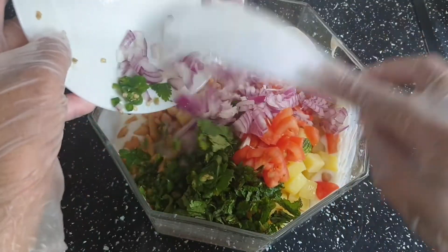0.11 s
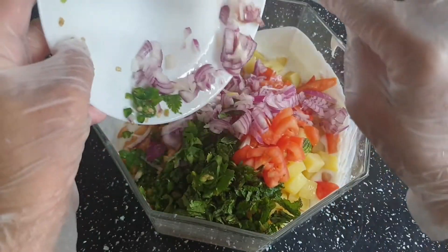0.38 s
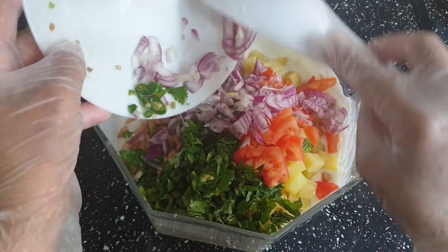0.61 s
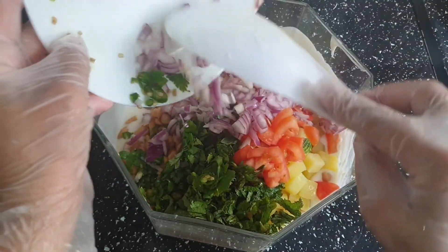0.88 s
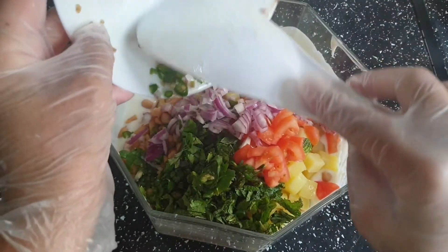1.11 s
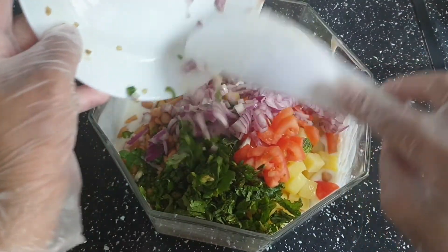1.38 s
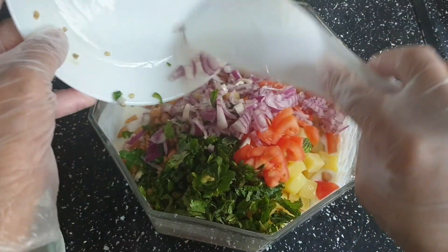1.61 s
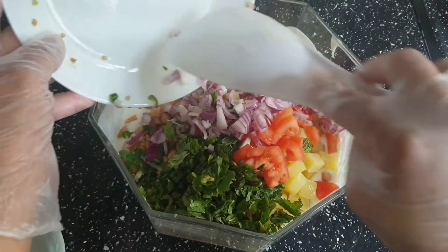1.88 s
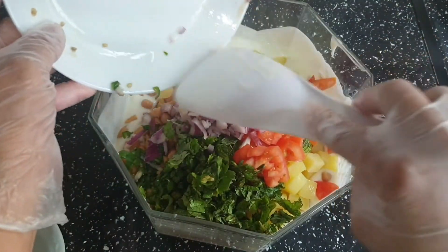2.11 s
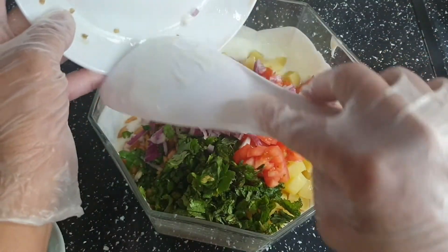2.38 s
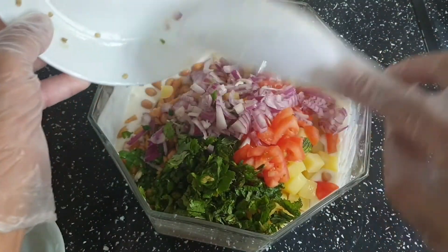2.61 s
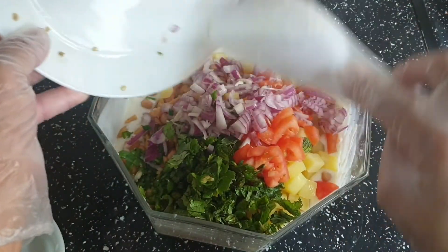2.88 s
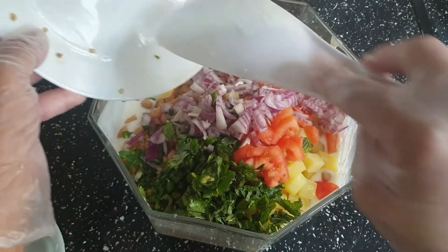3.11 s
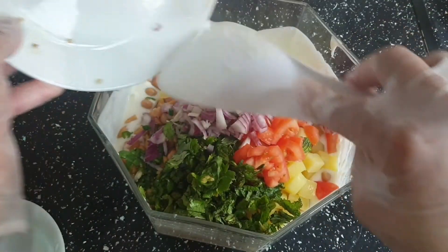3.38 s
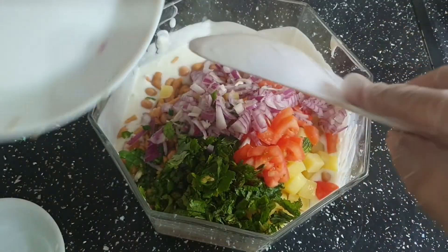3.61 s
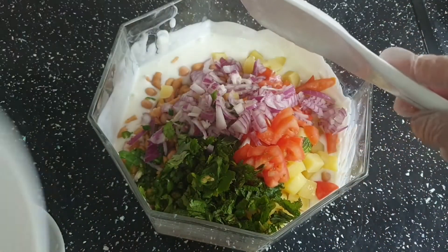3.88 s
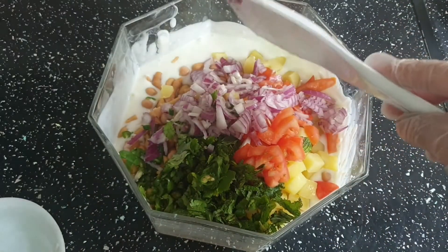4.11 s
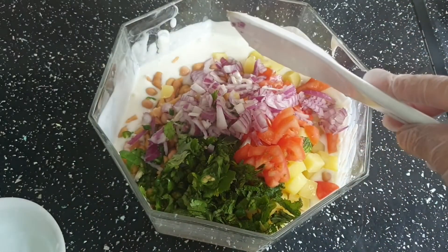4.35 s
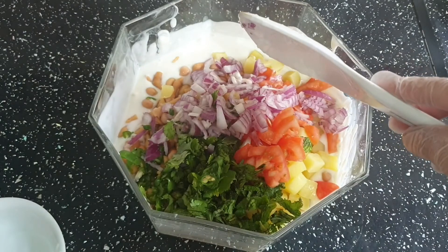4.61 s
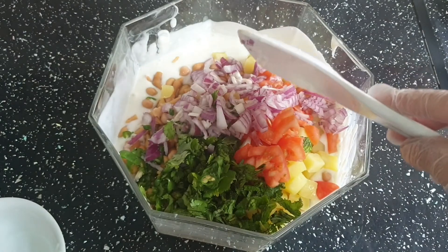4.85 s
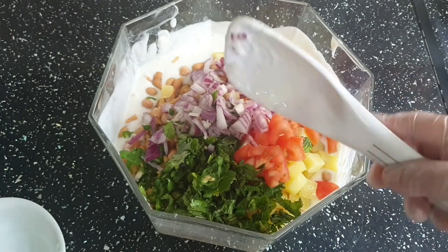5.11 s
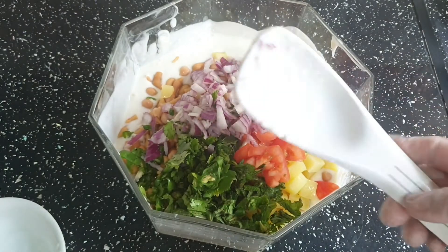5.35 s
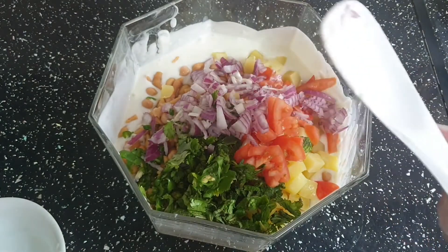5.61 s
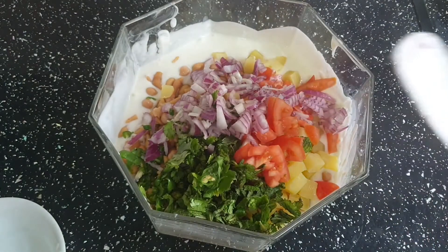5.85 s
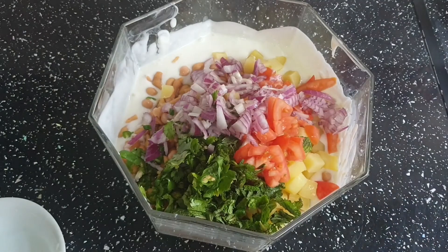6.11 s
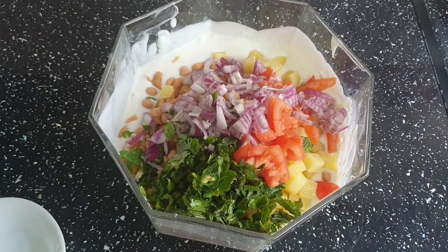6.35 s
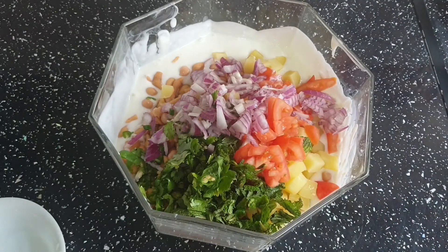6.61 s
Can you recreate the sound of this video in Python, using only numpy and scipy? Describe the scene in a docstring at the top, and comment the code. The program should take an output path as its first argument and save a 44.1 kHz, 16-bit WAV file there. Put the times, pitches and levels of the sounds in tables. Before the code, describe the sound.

In a small, hard-walled kitchen, a plastic spoon knocks a hand-held china plate about a dozen times, dry cracks with short bright rings and tiny scrapes. A quieter pause of soft thuds follows, then the plate clacks onto stacked dishes, is nudged along them, and the spoon drops hollowly on the counter. Close stereo pickup, plate well left, thuds nearer the middle, faint hiss.

```python
"""A plastic serving spoon knocks and scrapes chopped vegetables off a hand-held china plate into a glass bowl:
each blow is a dry crack plus the ringing modes of the plate. The plate is then laid on other dishes and pushed
along them, and the spoon is dropped on the counter. Gloves rustle, food is stirred and thuds softly, the counter
bumps and rumbles as coloured noise and low cycles; a small kitchen reflects, and a faint hiss swells as the
hands move. Two microphone ports hear it, the plate well to the left and the soft thuds nearer the middle."""
import sys
import numpy as np
from scipy import signal
from scipy.fft import rfft, irfft, next_fast_len
from scipy.io import wavfile

SR = 44100
rng = np.random.default_rng(int(sys.argv[2]) if len(sys.argv) > 2 else 0)


def log_audio(samples):
    """Write samples as a 16-bit WAV file to the path given in sys.argv[1]."""
    # one column per channel
    frames = np.atleast_2d(samples).T
    # limit to full scale, then quantise
    limited = np.clip(frames, -1, 1)
    pcm = np.round(limited * 32767).astype(np.int16)
    wavfile.write(sys.argv[1], SR, pcm)


def attenuation_scalar(level_db):
    """Turn a level in dB into a linear amplitude multiplier (20 dB per decade)."""
    decades = np.asarray(level_db, float) / 20
    return 10 ** decades


N = 296887   # samples
RING = np.arange(SR * 2 // 5) / SR   # time axis of one struck sound, s
PLATE_LEAD, COUNTER_LEAD = 5.1, 4.84   # samples by which the left port hears plate and dishes first


def rms_one(x):
    """Scale to unit rms."""
    return x / np.sqrt(np.mean(x ** 2) + 1e-20)


def at_hz(points, hz):
    """Read a (Hz, value) table on a log-frequency axis."""
    table_hz, values = np.array(points).T
    return np.interp(np.log(hz), np.log(table_hz), values)


def in_time(rows):
    """Columns of a curve table at every sample."""
    s, *columns = np.transpose(rows)
    return [np.interp(np.arange(N) / SR, s, c) for c in columns]


def add(track, s, sound):
    """Mix a sound in at s seconds."""
    i = round(s * SR)
    track[..., i:i + sound.shape[-1]] += sound[..., :N - i]


def shaped(x, gain):
    """Filter by a gain given as a function of Hz."""
    hz = np.maximum(np.fft.rfftfreq(x.shape[-1], 1 / SR), 20)
    return irfft(rfft(x) * gain(hz), x.shape[-1])


def decay(t60):
    """Exponential loss of energy: falls 60 dB in t60 seconds, never in less than 5 ms."""
    return attenuation_scalar(-60 * RING / max(t60, .005))


def burst(gain, t60):
    """Coloured noise that starts at once and dies, with a straight fade to the end; about rms 1 at its start."""
    noise = rms_one(shaped(rng.standard_normal(len(RING)), gain))
    return noise * decay(t60) * (1 - RING / RING[-1])


WAVER_PER_S = 75   # how fast grip and motion make a ringing mode waver


def modes(table, waves, group_db, length, place, spread_db, waver, fade=decay):
    """One blow: groups have their own strength; the place on the rim sets how far each pattern is driven."""
    hz, level_db, t60 = np.transpose(table)
    waves = np.array(waves)
    share = np.where(waves < 0, np.sin(-waves * place), np.cos(waves * place))
    sign = np.where(waves == 0, rng.choice([-1, 1], len(hz)), 1)
    chance_db = spread_db * rng.standard_normal(len(hz))
    strength = attenuation_scalar(level_db + group_db(hz) + chance_db) * share * sign
    out = 0
    for g, f, t in zip(strength, hz, t60):
        # a body that is held and moved wavers in phase and strength, more so as the ring goes on
        turn, swell = [np.interp(RING * WAVER_PER_S, np.arange(40), v) for v in rng.standard_normal((2, 40))]
        grown = waver * np.sqrt(min(f, 4500) / 1650) * (1 - np.exp(-RING / 0.023))
        tone = np.sin(2 * np.pi * f * RING + grown * turn)
        out = out + g * tone * np.exp(.5 * grown * swell) * fade(t * length)
    return out


# how the far port is shaded: pitch_hz, share (of a source's left minus right dB)
PORT_SHADOW = [(100, -0.07), (400, .5), (1500, 1.3955), (5000, 0.84), (12000, -0.23)]


def ports(x, pan_db, lead):
    """Direct sound at the two ports: the far one is shaded, most in the middle range, and hears later."""
    gain = lambda hz: attenuation_scalar(pan_db * at_hz(PORT_SHADOW, hz) * np.array([[.5], [-.5]]))
    late = lambda hz: np.exp(-2j * np.pi * hz * lead / SR * np.array([[0], [1]]))
    both = np.zeros((2, next_fast_len(len(x) + SR // 20)))
    both[:, :len(x)] = x
    return shaped(both, lambda hz: gain(hz) * late(hz))[:, :len(x)]


# colour of the plastic spoon's crack: pitch_hz, level_db (per Hz, relative)
SPOON_CRACK = [(88, -51), (150, -30), (941, 3.5), (1310, -10.5), (1660, -10), (2550, -4), (2810, -0.5),
               (3770, -8), (6770, -10.5), (9080, -31.5), (16000, -47)]


def knock(slope_db=0):
    """The spoon itself: a short dry crack, tilted by slope_db per octave about 2 kHz."""
    return burst(lambda hz: attenuation_scalar(at_hz(SPOON_CRACK, hz) + slope_db * np.log2(hz / 2000)), t60=0.052)


# while the spoon still touches, modes die in this share of their time; a weaker part rings on
CONTACT_SHARE, AFTER_DB = .45, -11


def touched(t60):
    """A quick first fall under the spoon, then the free ring."""
    return decay(t60 * CONTACT_SHARE) + attenuation_scalar(AFTER_DB) * decay(t60)


# spoon on plate: start_s, ring_db, crack_db, softness (0 = sharp edge), place_rad (on the rim)
PLATE_BLOWS = [(0.378, -16, -14, 0.16, 3.27), (0.401, -21, -39, 0, 0.31), (1.013, -49, -54, 1.1, 0.046),
               (1.083, -14.5, -29.5, 0.96, 2.77), (1.232, -26, -17.5, 1.1, 0.03),
               (1.556, -15, -18, 0.2, 1.05), (1.683, -25, -19, 1.3, 0.028), (1.999, -68.5, -74, 0, 1.44),
               (2.045, -24.5, -26.5, 1.7, 0.029), (2.396, -22, -23.5, 0, 2.28),
               (2.482, -24, -32.5, 0.27, 2.264), (2.532, -33.5, -45.5, .6, 0.0073),
               (2.79, -21, -21.5, .5, 3.17), (2.927, -32.5, -51, 1.2, 0.023),
               (3.259, -14.5, -18, 0.36, 2.204)]
# the plate moves in the hand: start_s, pan_db (left minus right),
# length (share of the free ring left by grip and spoon), crack_tilt_db (per octave, as the spoon turns)
PLATE_HOLD = [(0.38, 9.5, 0.31, -1), (1.01, 6.5, .6, 0.5), (1.08, 8.5, 0.14, -4), (1.23, 11.5, 0.38, 2.5),
              (1.56, 14, 0.39, 2), (1.68, 12.5, 0.26, 4.5), (2.05, 17.5, 0.44, -1), (2.4, 9.5, 0.25, 3),
              (2.48, 8, 0.21, 3), (2.54, 2, 0.37, -13), (2.8, 7.5, 0.44, 2.5), (3.26, 13, 0.5, -6)]
# groups of plate modes: pitch_hz, level_db (under a sharp blow), lost_db (per unit of softness)
PLATE_GROUPS = [(453, -9, 16), (880, -1.5, 17.5), (1782, -0.94, -0.77), (3020, -3, 18), (4500, -4.5, 31.5),
                (7000, 3.5, 41)]
# modes of the freely ringing plate: pitch_hz, level_db (within its group), t60_s
PLATE_MODES = [(435, -7, 0.82), (636, -5, 0.2), (924, -6, 0.56), (935, -5, 0.22), (1296, -5, 0.088),
               (1110, -7, 0.032), (1649, 0, 0.42), (1734, -4.5, 0.44), (1933, -8.5, 0.098),
               (2114, -20.5, 0.21), (2450, -18, 0.33), (2805, 7.5, 0.44), (2804, 3, 0.86),
               (3210, -8.5, 0.33), (3280, -10, 0.092), (3970, -12, 0.69), (4254, 5, 0.6), (4366, 1, 0.3),
               (4440, 1, 0.75), (4883, -8, 0.35), (5000, -14.5, 0.091), (5480, -1, 0.14), (5460, -9, 0.16),
               (6680, -8.5, 0.63), (7090, -5, 0.034), (6790, 3, 0.31), (7320, -2, 0.022), (7720, -5, 0.07),
               (9500, -31, 0.03), (13600, -14, 0.09)]
# waves round the rim of each plate mode; minus marks a pattern turned on the rim, mostly the twin of a
# split pair, 0 a lone mode
PLATE_RIM_WAVES = [0, 0, 2, -2, 0, 0, 3, -3, -1, 0, 0, 4, -4, 0, 0, 0, 5, -5, 0, 0, 0, 0, 0, 0, 0, 6, -6, 0,
                   0, 0]
# dense upper modes, heard as a splash: lowest_hz, highest_hz, level_db (against an untilted crack), t60_s (free)
PLATE_SPLASH = (8000.5, 15800, -37, 0.81)


def plate():
    """A crack plus the plate's ring; a softer contact leaves mostly the ring near 1.8 kHz, the grip shortens it."""
    out = np.zeros((2, N))
    low, high, top_db, top_t60 = PLATE_SPLASH
    group_hz, sharp_db, lost_db = np.transpose(PLATE_GROUPS)
    hold_s, *hold_columns = np.transpose(PLATE_HOLD)
    for s, ring_db, crack_db, softness, place in PLATE_BLOWS:
        pan_db, length, tilt_db = [np.interp(s, hold_s, c) for c in hold_columns]
        groups = np.transpose([group_hz, ring_db + sharp_db - softness * lost_db])
        ring = modes(PLATE_MODES, PLATE_RIM_WAVES, lambda hz: at_hz(groups, hz), length, place,
                     spread_db=1.5, waver=1.1, fade=touched)
        # the splash starts two octaves above the 2 kHz pivot of the tilt
        splash_db = crack_db + 2 * tilt_db + top_db
        splash = attenuation_scalar(splash_db) * burst(lambda hz: (hz > low) & (hz < high), top_t60 * length)
        crack = attenuation_scalar(crack_db) * knock(tilt_db)
        add(out, s, ports(crack + ring + splash, pan_db, PLATE_LEAD))
    return out


SCRAPE_PER_S, SCRAPE_RING_DB = 2200, -7   # mean catches per second; gain of the ring in each, dB
# spoon edge dragged over the glaze: start_s, length_s, level_db
PLATE_SCRAPES = [(1.24, 0.096, -69.5), (1.699, 0.09, -69), (2.409, 0.09, -60), (2.906, 0.0505, -52.5)]
# groups of plate modes a scrape excites: pitch_hz, level_db
SCRAPE_GROUPS = [(900, 0.5), (1650, 7.5), (2800, -1), (4400, -12), (6800, -5)]


def scrapes():
    """Dense uneven catches of the edge, each a tiny blow."""
    out = np.zeros(N)
    ring = modes(PLATE_MODES, PLATE_RIM_WAVES, lambda hz: at_hz(SCRAPE_GROUPS, hz), length=0.31, place=0.037,
                 spread_db=0.5, waver=0.68)
    tiny = knock() + attenuation_scalar(SCRAPE_RING_DB) * ring
    for s, length, level_db in PLATE_SCRAPES:
        count = 8000   # samples, longer than any stroke
        stroke = np.sin(np.pi * np.clip(np.arange(count) / SR / length, 0, 1)) ** .5
        catches = (rng.random(count) < SCRAPE_PER_S / SR) * rng.standard_normal(count)
        add(out, s, attenuation_scalar(level_db) * signal.fftconvolve(stroke * catches, tiny))
    return ports(out, 11.0, PLATE_LEAD)


STACK_TILT_DB = -6.5   # per octave, from 4.4 to 8.8 kHz
# plate laid on a stack of dishes: start_s, low_db (wide low modes), clack_db (clack and small modes),
# free_s (until the ring is stifled), place_rad (on the rim)
STACK_LANDINGS = [(4.645, -28.5, -37, 0.066, 0.017), (5.17, -33, -20, 0.035, 0.22)]
# modes of the stacked dishes, the first three wide and low: pitch_hz, level_db (within its group), t60_s
STACK_MODES = [(863.5, -2, 0.16), (1837, 3, 1), (1924, 10.5, .12), (2861, -17, .3), (4170, -8, 0.1),
               (4250, -17.5, 0.17), (4410, 7, 0.18), (4567, -7, 0.23), (6850, 5.5, 0.08),
               (7380, -10.5, 0.19), (8450, -11.5, 0.118), (10490, -28, .14), (10770, -12.5, 0.043),
               (12680, -10, 0.1)]
# waves round the rim of each stack mode; minus marks the turned twin of a split pair, 0 a lone mode
STACK_RIM_WAVES = [0, 2, -2] + [0] * 11


def stacked():
    """The wide low modes ring until the plate settles and stifles them; the small high ones ring on."""
    out = np.zeros(N)
    for s, low_db, clack_db, free_s, place in STACK_LANDINGS:
        groups = lambda hz: at_hz([(1850, low_db), (4400, clack_db), (8800, clack_db + STACK_TILT_DB)], hz)
        # falls at 900 dB per second once settled, to 36 dB down
        stifled = attenuation_scalar(np.maximum(-900 * np.maximum(RING - free_s, 0), -36))
        low = modes(STACK_MODES[:3], STACK_RIM_WAVES[:3], groups, length=1, place=place, spread_db=1, waver=.3)
        high = modes(STACK_MODES[3:], STACK_RIM_WAVES[3:], groups, length=1, place=place, spread_db=2, waver=.8)
        add(out, s, attenuation_scalar(clack_db) * knock() + stifled * low + high)
    return ports(out, 8.5, COUNTER_LEAD)


# spoon dropped flat, handle then bowl: start_s, ring_db, crack_db
SPOON_CONTACTS = [(6.5612, -14, -26), (6.5668, -24.5, -40.5)]
# modes of the plastic spoon: pitch_hz, level_db, t60_s (before drop() shortens it)
SPOON_MODES = [(326, -29, 0.018), (460, 5.5, 0.043), (661, -11, 0.081), (1056, -3, 0.026),
               (1426, -15.5, 0.041), (4490, -10.5, 0.016), (6970, -7.5, 0.0224)]


def drop():
    """Two quick contacts, each a hollow plastic ring and a bright crack."""
    out = np.zeros(N)
    for s, ring_db, crack_db in SPOON_CONTACTS:
        ring = modes(SPOON_MODES, [0] * len(SPOON_MODES), np.zeros_like, length=0.83, place=0,
                     spread_db=4.5, waver=0.5)
        crack = burst(lambda hz: attenuation_scalar(-1.5 * np.log2(hz / 4000)), t60=0.073)
        add(out, s, attenuation_scalar(ring_db) * ring + attenuation_scalar(crack_db) * crack)
    return ports(out, 14.0, lead=-0.01)


def drift(rate):
    """Slow chance of spread about 1, with rate (at most 40) new values per second."""
    steps = int(N / SR * 40) + 2
    # straight lines between the values narrow the spread; 1.3 makes up for it
    return np.interp(np.arange(N) / SR * rate, np.arange(steps), rng.standard_normal(steps)) * 1.3


SWELL_SKEW = 0.59   # under 1: quicker to rise than to fall


def swells(rows):
    """Each row (start_s, length_s, level_db) rises and falls as a leaning half sine; powers add."""
    seconds = np.arange(N) / SR
    power = 0
    for s, length, level_db in rows:
        progress = np.clip((seconds - s) / length, 0, 1)
        power = power + (attenuation_scalar(level_db) * np.sin(np.pi * progress ** SWELL_SKEW)) ** 2
    return np.sqrt(power)


# plate pushed along the stack: start_s, length_s, level_db
PLATE_PUSHES = [(5.185, 0.14, -44.5), (5.27, 0.12, -44), (5.37, 0.1975, -46.5)]
# resonances of the stack under friction: pitch_hz, width_hz, level_db
STACK_BODY = [(406, 51, 12), (736, 14, -31.5), (1020, 30, -13.5), (1590, 47, -8), (1944, 120, -16.5),
              (2760, 54, -18)]


def slide():
    """Grainy friction through the resonances of the stack."""
    grains = rng.standard_normal(N) * attenuation_scalar(7.9 * drift(35))
    resonance = lambda hz, f, width: 1 / np.sqrt(1 + (2 * (hz - f) / width) ** 2)
    body = lambda hz: 0.0053 + sum(attenuation_scalar(db) * resonance(hz, f, width) for f, width, db in STACK_BODY)
    return ports(rms_one(shaped(grains, body)) * swells(PLATE_PUSHES), 10.0, COUNTER_LEAD)


# dull thuds on bowl and counter: start_s, level_db, brightness_db (per octave), t60_s, swell_s
SOFT_THUDS = [(0.222, -48, -20, 0.38, 0.0065), (0.834, -43, -18, 0.39, .002),
              (0.931, -46.5, -17.5, 0.3, .004), (3.068, -54, -18, 0.34, 0.0034),
              (3.191, -45, -17.5, 0.21, 0.0016), (3.545, -43.5, -17, 0.42, 0.014),
              (3.845, -45.5, -16, 0.37, .015), (4.641, -31.5, -11, 0.3, 0.0019),
              (4.743, -40, -15.5, 0.44, 0.0027), (5.167, -23, -10.5, 0.2, 0.0018),
              (6.089, -46, -15.5, 0.31, .0015), (6.412, -59, -21.5, 0.18, 0.0029),
              (6.56, -27, -10.5, 0.33, 0.0036)]


def thuds():
    """Low noise that swells and dies; harder things are brighter."""
    out = np.zeros(N)
    for s, level_db, slope_db, t60, swell_s in SOFT_THUDS:
        colour = lambda hz: attenuation_scalar(slope_db * np.log2(1 + hz / 600)) * hz / (hz + 120)
        add(out, s, attenuation_scalar(level_db) * burst(colour, t60) * (1 - np.exp(-RING / swell_s)))
    return ports(out, 3.1, lead=0.85)


BUMP_RISE_S, BUMP_CYCLES = 0.006, 15   # swell time; cycles to fall 60 dB
# low bumps through the counter: start_s, level_db, pitch_hz
COUNTER_BUMPS = [(0.845, -34.5, 112), (1.04, -43, 60.4), (1.28, -58, 55), (1.601, -49, 109),
                 (1.687, -49.5, 61.5), (2.4, -45.5, 62.6), (2.47, -50, 115), (3.25, -57, 111),
                 (3.581, -55, 121), (3.85, -51.5, 92.4), (4.637, -41.5, 115.8), (4.751, -41.5, 67.8),
                 (5.16, -49.5, 136), (5.312, -41.5, 123), (5.95, -50.5, 60.1), (6.09, -46.5, 70.3),
                 (6.22, -54.5, 62), (6.558, -24, 125), (6.585, -45, 45)]


def bumps():
    """The counter gives under a push: a few low cycles that swell and die, nearly alike in both ports."""
    out = np.zeros(N)
    turns = rng.uniform(0, 2 * np.pi, len(COUNTER_BUMPS))
    for (s, level_db, hz), turn in zip(COUNTER_BUMPS, turns):
        cycles = np.sin(2 * np.pi * hz * RING + turn)
        add(out, s, attenuation_scalar(level_db) * cycles * np.tanh(RING / BUMP_RISE_S) * decay(BUMP_CYCLES / hz))
    return out * attenuation_scalar(np.array([[0.9], [-0.9]]))


KITCHEN_DB = -12   # reflections against the direct sound
EDGES = 30 * 2 ** np.arange(0, 9.3, .5)   # half-octave band edges, Hz
# how long the kitchen rings: pitch_hz, t60_s
KITCHEN_T60 = [(100, 0.82), (500, 0.31), (2000, 0.35), (6000, 0.38), (14000, 0.043)]


def kitchen(x):
    """Reflections of hard walls: noise dying band by band, its own in each port."""
    tail = np.zeros((2, len(RING)))
    white = rng.standard_normal((2, len(RING)))
    for low, high in zip(EDGES, EDGES[1:]):
        band = shaped(white, lambda hz: (hz >= low) & (hz < high))
        tail += band * decay(at_hz(KITCHEN_T60, np.sqrt(low * high)))
    tail *= 1 - np.exp(-RING / 0.0022)   # reflections take some ms to gather
    tail /= np.sqrt(np.sum(tail ** 2) / 2)
    return attenuation_scalar(KITCHEN_DB) * signal.fftconvolve(x[None], tail, axes=1)[:, :N]


# how alike background noise is in the two ports: pitch_hz, likeness (0 to 1)
PORT_LIKENESS = [(60, 0.98), (500, 0.44), (1300, 0.088), (15000, 0.054)]


def stereo_noise(spectrum, patchy_db, balance=((100, 2.0), (10000, 2.0))):
    """Noise of a given colour, partly alike in both ports, flickering; rms 1. balance: left minus right dB."""
    mid, side = rng.standard_normal((2, N))
    alike = lambda hz: np.clip(at_hz(PORT_LIKENESS, hz), 0, .99)
    mid = shaped(mid, lambda hz: np.sqrt(1 + alike(hz)))
    side = shaped(side, lambda hz: np.sqrt(1 - alike(hz)))
    colour = lambda hz: attenuation_scalar(at_hz(spectrum, hz) + at_hz(balance, hz) * np.array([[0], [-1]]))
    noise = shaped(np.array([mid + side, mid - side]), colour)
    return rms_one(noise * attenuation_scalar(patchy_db * drift(13)))


# how busy the hands are, as the level of their faint treble: start_s, level_db
HAND_MOTION = [(0.0, -77), (0.37, -69.5), (0.8, -75.5), (1.14, -74), (2.29, -89), (2.68, -87.5),
               (3.26, -86), (3.47, -74.5), (4.57, -90.5), (5.21, -77.5), (5.34, -67.5), (5.59, -74),
               (6.5, -71), (6.73, -57.5)]
# gloves rub together: start_s, length_s, level_db
GLOVE_RUBS = [(0.785, .015, -74), (0.92, .14, -78.5), (3.54, .2, -70.5), (3.87, .06, -77.5),
              (5.065, 0.0084, -76.5), (5.37, .11, -67), (5.595, .02, -79), (5.815, 0.019, -84),
              (5.87, .3, -85.5), (6.11, 0.013, -78), (6.58, .3, -66)]
# food and hands stirred: start_s, length_s, level_db
FOOD_STIRS = [(0.3, 0.51, -58), (1.09, 0.19, -72), (2.9, 0.1, -52), (3.2, .2, -63.5), (3.98, 0.61, -77.5),
              (4.73, 0.15, -62), (6.6, 0.18, -49)]
# someone leans on the counter and it rumbles: start_s, length_s, level_db
COUNTER_LEANS = [(-.2, 0.96, -67), (1.1, 0.27, -69.5), (1.9, 0.43, -82.5), (3.1, 1.03, -73.5),
                 (4.95, 1.74, -63), (6.4, 0.97, -62)]
# colour of the gloves: pitch_hz, level_db (per Hz, relative)
GLOVE_COLOUR = [(800, -59), (2500, -19), (4500, -1), (7000, -4), (9500, -2), (12500, 1.5), (16000, -4.5)]
# colour of the background hiss: pitch_hz, level_db (per Hz, relative)
HISS_COLOUR = [(18, -23), (30, -7), (127, -5), (161, -3), (266, -14), (584, -8), (1220, -33.5), (1390, -13),
               (1670, -2.5), (2170, 3), (3060, -1), (3870, -20), (7090, -6), (9710, -30.5), (16000, -30.5)]
# where the hiss lies: pitch_hz, pan_db (left minus right)
HISS_PAN = [(60, 1.5), (120, 1.5), (240, 1.5), (480, -0.5), (950, 0), (1890, 31), (3770, 7.5), (7520, 8),
            (15000, -4)]
RUSTLE_DB = -4   # gloves, over the motion level
# level when the motion stands at -80 dB; dB gained per dB of motion
HISS_DB, HISS_FOLLOWS = -66, 0.43
SHUFFLE_DB, SHUFFLE_FOLLOWS = -73.5, 0.52
RUMBLE_DB = -76   # steady part of the rumble


def background():
    """Noises of four colours: hiss, shuffle and rustle follow the hands, rumble swells with leaning; plus bumps."""
    motion_db, = in_time(HAND_MOTION)
    busy_db = motion_db + 80
    rumble = stereo_noise([(12, -58), (25, -25.0), (45, 4.0), (110, -4.5), (200, -24), (500, -93.5)], patchy_db=1.0)
    shuffle = stereo_noise([(50, -64.0), (120, -16.5), (250, -7.5), (440, 3.5), (600, -4.0), (1200, -10.5),
                            (2200, -33), (5000, -82.5)], patchy_db=4.0)
    rustle = stereo_noise(GLOVE_COLOUR, patchy_db=1.8)
    hiss = stereo_noise(HISS_COLOUR, patchy_db=.7, balance=HISS_PAN)
    hiss_level = attenuation_scalar(HISS_DB + HISS_FOLLOWS * busy_db)
    rumble_level = attenuation_scalar(RUMBLE_DB) + swells(COUNTER_LEANS)
    shuffle_level = attenuation_scalar(SHUFFLE_DB + SHUFFLE_FOLLOWS * busy_db) + swells(FOOD_STIRS)
    rustle_level = attenuation_scalar(motion_db + RUSTLE_DB) + swells(GLOVE_RUBS)
    moving = rumble_level * rumble + shuffle_level * shuffle + rustle_level * rustle
    return hiss_level * hiss + moving + bumps()


def scene():
    """Plate on the left, soft thuds nearer the middle, struck sounds reflected by the kitchen."""
    dishes = stacked()
    direct = plate() + scrapes() + dishes + thuds() + drop() + slide()
    walls = kitchen((direct - .7 * dishes).mean(axis=0))   # the low stack sends less to the walls
    cut = signal.butter(2, 160, "high", fs=SR, output="sos")   # small things radiate no deep bass
    return signal.sosfilt(cut, direct + walls) + background()


def top_cut(x):
    """Nothing passes above the cut-off."""
    return signal.sosfilt(signal.butter(12, 16850, fs=SR, output="sos"), x)


def record(dry):
    """The loudest peaks of the two ports are softly rounded."""
    rounded = .99 * np.tanh(dry / 1.1)
    return top_cut(rounded)


dry = scene()
out = record(dry)
log_audio(out)
```